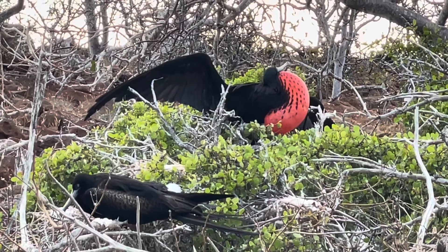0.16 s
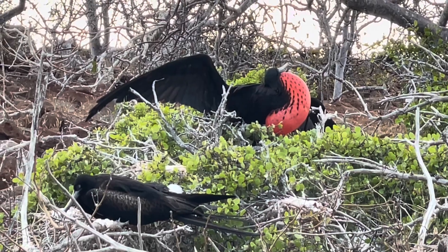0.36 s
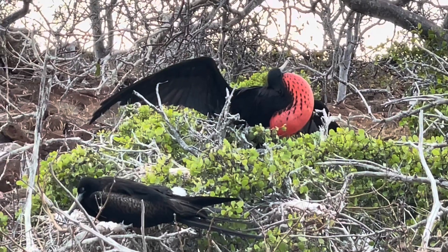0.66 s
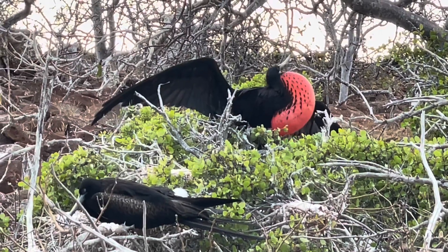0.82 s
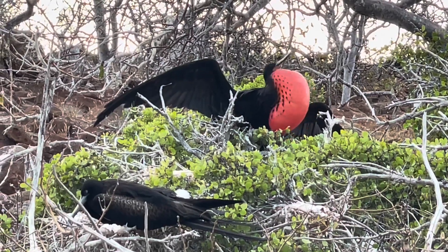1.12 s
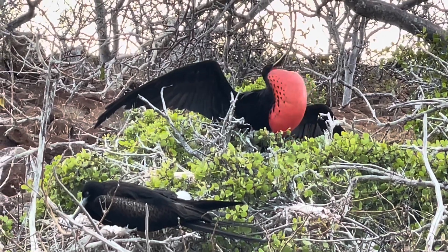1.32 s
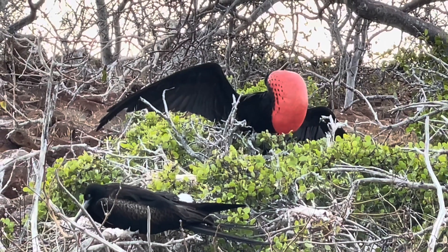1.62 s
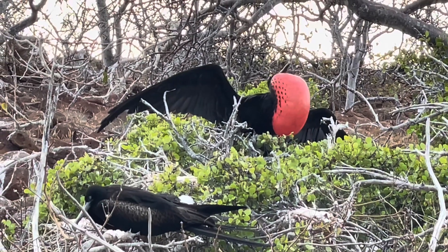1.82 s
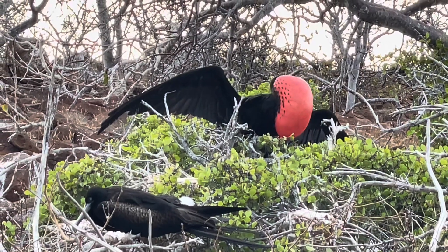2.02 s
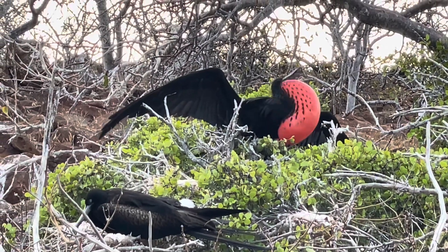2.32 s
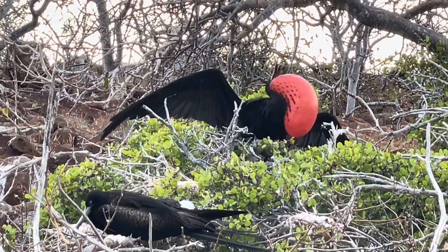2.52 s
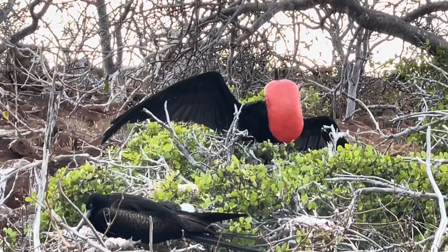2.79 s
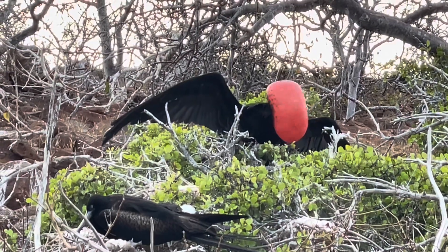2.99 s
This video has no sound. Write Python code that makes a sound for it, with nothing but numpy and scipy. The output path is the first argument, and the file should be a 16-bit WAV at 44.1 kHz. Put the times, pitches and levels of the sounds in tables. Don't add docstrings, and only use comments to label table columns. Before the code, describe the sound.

Outdoors among bushes, seabird bill rattling ticks softly under a trembling rising whistle, then bright short chips and dry ticks quicken, a second whistle wavers, and a hollow pouch knock closes, over low wind rumble.

```python
import sys
import numpy as np
from scipy import signal
from scipy.fft import rfft, irfft
from scipy.io import wavfile
from scipy.ndimage import uniform_filter1d

SR = 44100
rng = np.random.default_rng(int(sys.argv[2]) if len(sys.argv) > 2 else 0)


def gain_from_decibels(decibels):
    exponent = np.asarray(decibels, float) / 20
    return 10 ** exponent


def master_out(mix):
    frames = np.transpose(np.atleast_2d(mix))
    ceiling = np.clip(frames, -1, 1)
    pcm = np.round(ceiling * 32767).astype(np.int16)
    wavfile.write(sys.argv[1], SR, pcm)


N = 138915
OPPOSED = np.array([[1], [-1]])


def curve(table, x, col=1):
    rows = np.array(table, float)
    return np.interp(x, rows[:, 0], rows[:, col])


def unit(x):
    return x / np.sqrt(np.mean(x ** 2))


def band(x, lo_hz, hi_hz):
    edges_hz = [lo_hz, min(hi_hz, 0.45 * SR)]
    return signal.sosfilt(signal.butter(2, edges_hz, "band", fs=SR, output="sos"), x)


def walk(rate_hz):
    k = int(SR / rate_hz)
    steps = np.repeat(rng.standard_normal(N // k + 1), k)
    return unit(uniform_filter1d(uniform_filter1d(steps, k), k)[:N])


def add(out, s, sound, pan_db=0.0):
    i = int(round(s * SR))
    n = min(len(sound), N - i)
    out[:, i:i + n] += sound[:n] * gain_from_decibels(pan_db * OPPOSED / 2)


# t/s, peak level/dB, f/Hz, level of lowest partial/dB
CHIP_EVENTS = [
    (2.0213, -40.5, 4764, -8),
    (2.1441, -47, 4670, -1.5),
    (2.2548, -54.5, 4470, 2.5),
    (2.349, -46, 4680, -7.5),
    (2.4639, -39.5, 4790, -10),
    (2.571, -39.5, 4710, -11.5),
    (2.6845, -38, 4784, -8.5),
    (2.817, -34.5, 4770, -13),
    (3.0833, -41, 4620, -6),
]
# f of lowest partial/Hz, upper partials' level/dB, crack level/dB
CHIP_SPECTRA = [(2320, 9, -26), (2430, -8, -32), (2400, 3, -17), (2450, 2.5, -24), (2480, 0, -18),
                (2350, 8.5, -20), (2450, 8, -25), (2450, 4.5, -22.5), (2380, -2, -21.5)]
# ratio to the pitch, level/dB
UPPER_PARTIALS = [(1.139, -22), (1.37, -28), (1.46, -22.5), (1.62, -38), (1.98, -33.5), (2.4, -57)]


def chips():
    hold_s, rise_s, fall_s, sag = 0.00192, 0.00039, 0.0005, 0.0085
    out, t = np.zeros((2, N)), np.arange(400) / SR
    rise = 1 - np.exp(-(t / rise_s) ** 2)
    env = rise * np.exp(-np.maximum(t - hold_s, 0) / fall_s)
    turn = 2 * np.pi * (t - sag * t ** 2 / hold_s / 2)
    phases = rng.random((len(CHIP_EVENTS), 8))
    noises = rng.standard_normal((len(CHIP_EVENTS), 400))
    for event, spectrum, phase, noise in zip(CHIP_EVENTS, CHIP_SPECTRA, phases, noises):
        s, db, hz, low_db = event
        low_hz, top_db, crack_db = spectrum
        octave = env * np.sin(hz * turn)
        fundamental = np.roll(env, 20) * np.sin(low_hz * turn + 2 * np.pi * phase[0])
        tone = octave + gain_from_decibels(low_db) * fundamental
        for (ratio, partial_db), p in zip(UPPER_PARTIALS, phase[1:]):
            level = gain_from_decibels(partial_db + top_db * (ratio > 1.2))
            tone += level * env * np.sin(ratio * hz * turn - 2.5 + 2.8 * p)
        tone += gain_from_decibels(crack_db) * rise * np.exp(-t / 0.0015) * 3 * band(noise, 3000, 7700)
        add(out, s - 0.0009, gain_from_decibels(db + 2) * tone)
    return out


def clicks(table, col, lo_hz, hi_hz, decay_s, gain_db):
    out, t = np.zeros((2, N)), np.arange(600) / SR
    for row, noise in zip(table, rng.standard_normal((len(table), 600))):
        crack = band((noise + 0.89 * (t == 0)) * np.exp(-t / decay_s), lo_hz, hi_hz)
        add(out, row[0], gain_from_decibels(row[col] + gain_db) * crack / np.abs(crack).max())
    return out


# t/s, treble peak level/dB, mid peak level/dB, low peak level/dB
TICK_EVENTS = [(.4352, -55.5, -54, -52.5), (.447, -70, -68, -68), (1.599, -71, -80, -55.5),
               (1.8035, -79, -62.5, -62.5), (2.021, -59, -73, -70), (2.0485, -68, -60, -55),
               (2.185, -63, -57, -48.5), (2.211, -60, -67, -50), (2.2535, -70, -73, -61),
               (2.294, -68, -66, -58.5), (2.348, -69, -65, -59), (2.3885, -71, -73, -59.5),
               (2.463, -52, -77, -80), (2.529, -71, -64, -57), (2.5705, -60, -75, -75),
               (2.6072, -54, -54, -53), (2.635, -57, -58, -56), (2.684, -59, -75, -74),
               (2.7228, -64, -63, -58), (2.7535, -64, -58, -57), (2.877, -91, -64, -53.5),
               (3.1197, -52, -36, -38)]


def ticks():
    out = clicks(TICK_EVENTS, col=1, lo_hz=8200, hi_hz=14800, decay_s=0.00027, gain_db=2.5)
    out += clicks(TICK_EVENTS, col=2, lo_hz=3240, hi_hz=8300, decay_s=0.00094, gain_db=-6.0)
    return out + clicks(TICK_EVENTS, col=3, lo_hz=1760, hi_hz=3900, decay_s=0.0026, gain_db=-1.0)


def whistle(crest, dips, dip_s):
    t = np.arange(N) / SR
    s, drop_hz, swell_db = np.array(dips, float).T
    dip = np.exp(-np.abs((t[:, None] - s) / dip_s) ** 2.5)
    hz = curve(crest, t) - dip @ drop_hz
    sweep = np.abs(np.gradient(hz)) * SR
    db = curve(crest, t, col=2) + dip @ swell_db - 6.5 * sweep / 124000.0
    on = uniform_filter1d(1.0 * (t > crest[0][0]) * (t < crest[-1][0]), size=400)
    waver_db, waver_hz = 1.3 * walk(130), 15 * walk(200)
    return on * gain_from_decibels(db + 3 + waver_db) * np.sin(2 * np.pi * np.cumsum(hz + waver_hz) / SR)


# t/s, f/Hz, level/dB
FIRST_CREST = [
    (.555, 2000, -78.5),
    (.62, 2204, -69.5),
    (.70, 2232, -66),
    (.787, 3050, -67),
    (.87, 2880, -63.5),
    (.99, 3402, -67.5),
    (1.09, 3964, -82),
    (1.20, 3518, -75),
    (1.39, 3646, -81),
]
SECOND_CREST = [
    (2.612, 2050, -67),
    (2.64, 2583, -72.5),
    (2.685, 2850, -68.5),
    (2.775, 3003, -102),
    (2.79, 3084, -76),
    (2.83, 3250, -76),
    (2.92, 3286, -66),
    (3.02, 3290, -71.5),
    (3.15, 3500, -76.5),
]
# t/s, drop in f/Hz, change in level/dB
FIRST_DIPS = [(0.767, 298, 5), (.802, 559, 6), (.84, 400, 4.5), (0.874, 251.4, 3), (.912, 401.6, 2.5),
              (.946, 618.4, 7.5), (.982, 784, 6.5), (1.022, 947, 11), (1.053, 1164, 18.5),
              (1.088, 1327, 23.5), (1.124, 1209, 22.5), (1.157, 478, 9), (1.187, 299, 11.5),
              (1.229, 420, 13), (1.263, 884, 10.5), (1.303, 1104, 18), (1.342, 1180, 16), (1.361, 828, 9.5),
              (1.376, 1158, 9.5)]
SECOND_DIPS = [(2.65, 149, 0), (2.79, 78.5, 9), (2.834, 398, 1), (2.874, 562, 7.5), (2.905, 202, -2),
               (2.937, 117, -1), (2.968, 600, 1), (3.031, 706, 7), (3.066, 869, 10.5), (3.10, 920, 17),
               (3.133, 980, 19)]
# t/s, f/Hz, level/dB
OTHER_PIPE = [
    (.84, 2750, -91),
    (.9, 2775, -83),
    (1.23, 2763, -75.5),
    (1.29, 2730, -96),
]


def second_bird():
    first = whistle(FIRST_CREST, FIRST_DIPS, dip_s=0.011)
    second = whistle(SECOND_CREST, SECOND_DIPS, dip_s=0.009)
    late_rises = [(d[0] + 0.016, -60, -4) for d in FIRST_DIPS]
    return first + second + whistle(OTHER_PIPE, late_rises, dip_s=0.009)


# t/s, peak level/dB
KNOCK_EVENTS = [
    (1.599, -49),
    (3.1189, -29.5),
]
# f/Hz, level/dB, T60/s
POUCH_MODES = [(374, -5, 0.12), (753, 4, 0.057), (1184, 3, 0.075), (1536, -16.5, 0.32), (3280, -4, 0.012),
               (600, 11.5, 0.011), (980, 8.5, 0.013)]


def knocks():
    out, t = np.zeros((2, N)), np.arange(6000) / SR
    for (s, db), noise in zip(KNOCK_EVENTS, rng.standard_normal((len(KNOCK_EVENTS), 6000))):
        ring = np.zeros(len(t))
        for hz, mode_db, t60 in POUCH_MODES:
            swell = 1 - np.exp(-t * hz / 0.33)
            decay = np.exp(-np.log(1000) * t / t60)
            ring -= gain_from_decibels(mode_db) * np.sin(2 * np.pi * hz * t - 450 / hz) * swell * decay
        add(out, s + 0.001117, gain_from_decibels(db) * ring / 4, pan_db=-1.5)
        crack = unit(band(noise, 520, 2030)) * np.exp(-t / 0.0052)
        add(out, s, gain_from_decibels(db - 20.5) * crack, pan_db=-1.5)
    return out


# t/s, length/s, level/dB, top f/Hz
RUSTLE_EVENTS = [(0.432, 0.043, -86, 15000), (1.42, 0.033, -96.5, 14500), (2.06, 0.018, -92, 14000),
                 (2.148, .012, -88, 13500), (2.215, 0.028, -91, 15500), (2.28, 0.033, -86, 14700),
                 (2.364, .008, -87, 13500), (2.396, .022, -89, 16000), (2.5, .035, -91, 14300),
                 (2.573, 0.01, -87, 13800), (2.63, 0.022, -87, 14800), (2.747, .04, -89, 15000),
                 (2.84, .02, -106, 14300), (3.13, 0.011, -71.5, 15500)]


def rustles():
    t, out = np.arange(N) / SR, np.zeros((2, N))
    crackle_db = 1.7 * uniform_filter1d(rng.exponential(size=N), size=3)
    grains = rng.standard_normal((2, N)) * gain_from_decibels(crackle_db)
    grains = grains[0] + 0.45 * OPPOSED * grains[1]
    low = gain_from_decibels(5.5) * unit(band(grains, 3600, 6300))
    for s, length, db, top_hz in RUSTLE_EVENTS:
        near = slice(int((s - 2 * length) * SR), int((s + 2 * length) * SR))
        high = unit(band(band(grains[:, near], 10300, top_hz), 10300, top_hz))
        puff = np.exp(-((t[near] - s) / length) ** 4)
        out[:, near] += gain_from_decibels(db) * puff * (high + low[:, near])
    return out * gain_from_decibels(2.0 * walk(39.8))


# t/s, peak level/dB, centre f/Hz
RATTLE_BEATS = [(0.0102, -68, 4730), (0.0424, -73, 3700), (0.0762, -76, 4800), (0.109, -66.5, 4060),
                (0.1411, -77, 3870), (0.1714, -63, 3890), (0.184, -70, 5280), (0.1954, -68, 3800),
                (0.2069, -69, 3840), (0.2405, -63.5, 3820), (0.2743, -74, 3700), (0.3093, -70.5, 4150),
                (0.3415, -67, 4000), (0.3754, -70, 4000), (0.398, -73, 4440), (0.4086, -66, 4300),
                (0.4753, -69, 5210), (0.5116, -68, 4140), (0.5437, -73, 5420), (0.5795, -69.5, 5220),
                (0.6139, -77, 3900), (0.648, -78, 4350), (0.6799, -71.5, 5180), (0.7155, -71, 4800),
                (0.7493, -69, 3820), (0.784, -70, 4610), (0.8153, -68, 4400), (0.8494, -75, 4930),
                (0.887, -68.5, 3860), (0.9817, -72, 3800), (1.0174, -79, 3700), (1.0489, -69, 3810),
                (1.7289, -78, 3730), (1.8628, -73, 4100), (1.93, -66, 5000), (2.9478, -61.5, 3880)]


def rattle():
    out, t = np.zeros((2, N)), np.arange(400) / SR
    for (s, db, hz), noise in zip(RATTLE_BEATS, rng.standard_normal((len(RATTLE_BEATS), 2, 400))):
        crack = band(noise[0], hz / 1.4, hz * 1.12) + gain_from_decibels(-15) * band(noise[1], 2900, 8200)
        crack = crack * np.exp(-t / 0.0017)
        add(out, s, gain_from_decibels(db + 0.5) * crack / np.abs(crack).max())
    return out


# start t/s, end t/s, first
# f/Hz, last f/Hz, level/dB
FAR_WHISTLES = [
    (1.407, 1.543, 2400, 2494, -86),
    (1.548, 1.615, 2880, 3000, -86),
    (1.606, 1.673, 2320, 2255, -80.5),
    (1.709, 1.87, 2500, 2545, -86),
    (1.841, 2.002, 2890, 3150, -84.5),
    (1.902, 1.95, 5320, 5150, -89),
    (1.025, 1.255, 3900, 3930, -94),
]


def far_calls():
    total = 0
    for s0, s1, hz0, hz1, db in FAR_WHISTLES:
        total = total + whistle([(s0, hz0, db), (s1, hz1, db)], [(s0, 0, 0)], dip_s=0.009)
    return total * gain_from_decibels(4 * walk(40) - 3)


def shrubs(x):
    t = np.arange(int(0.4 * SR)) / SR
    fade = np.exp(-np.log(1000) * t / 0.24) + gain_from_decibels(6) * np.exp(-t / 0.0045)
    patchy = gain_from_decibels(1.5 * walk(300)[:len(t)] + 5 * rng.standard_normal(len(t)))
    after_gap = t > 0.0012
    tails = band(rng.standard_normal((2, len(t))) * patchy * fade * after_gap, 240, 12000)
    tails[1] = 0.85 * tails[0] + 0.5 * tails[1]
    tails /= np.sqrt(np.sum(tails[0] ** 2))
    return gain_from_decibels(-13) * np.array([signal.fftconvolve(x, tail)[:N] for tail in tails])


# f/Hz, lead of the left port/rad
PORT_PHASE = [(1400, 0), (5000, 0.9), (5900, -1), (7700, -1.2), (9500, -4.2), (12000, -6)]


def ports(x):
    turn = curve(PORT_PHASE, np.arange(N // 2 + 1) * SR / N) / 2
    return irfft(rfft(x) * np.exp(1j * turn * OPPOSED), N)


# t/s, level/dB
DRONE_LEVEL = [(0, -55.5), (.15, -51), (.42, -51.5), (.62, -46.5), (.7, -61.5), (.8, -50), (1.03, -59.5),
               (1.13, -43), (1.21, -57), (1.32, -53), (1.68, -45.5), (1.78, -65), (2.26, -49), (2.35, -54),
               (2.43, -50), (2.76, -50), (2.86, -70), (3.15, -54.5)]
# f/Hz, width/Hz, level/dB
RUMBLE_BANDS = [(58.4, 17.9, -57), (90.6, 5.2, -60.5), (128.56, 13.8, -59), (160.4, 34, -66)]


def drone():
    t = np.arange(N) / SR
    hz = 66.3 + 2.544 * walk(10)
    low = gain_from_decibels(curve(DRONE_LEVEL, t) + 1.5) * np.sin(2 * np.pi * np.cumsum(hz) / SR)
    for hz, width, db in RUMBLE_BANDS:
        low += gain_from_decibels(db) * unit(band(rng.standard_normal(N), hz - width / 2, hz + width / 2))
    return low * gain_from_decibels(1.6 * OPPOSED / 2)


def shaped_noise(table):
    rows, hz = np.array(table, float), np.arange(N // 2 + 1) * SR / N + 0.0012
    outside = (hz < rows[0, 0]) | (hz > rows[-1, 0])
    db = np.interp(np.log(hz), np.log(rows[:, 0]), rows[:, 1]) - 60 * outside
    return rfft(rng.standard_normal(N)) * gain_from_decibels(db), hz


# f/Hz, level/dB
SIDE_LEVEL = [(60, -7), (380, -6.5), (700, 4.5), (1290, -4.5), (2380, -20.5), (4400, -17), (8100, 11),
              (15000, -11.5)]


def air(table, db, flicker_db):
    mid, hz = shaped_noise(table)
    side = shaped_noise(table)[0] * gain_from_decibels(curve(SIDE_LEVEL, hz))
    mid, side = irfft(mid, N), irfft(side, N)
    level = gain_from_decibels(db + flicker_db * walk(12.0)) / np.sqrt(np.mean(mid ** 2))
    return level * (mid + side * OPPOSED)


# f/Hz, level per Hz/dB
WIND_SPECTRUM = [(28, -13), (100, 2.5), (300, -11.5), (800, -20), (1400, -21.5), (1800, -29), (2600, -28.5),
                 (4000, -42.5)]
HISS_SPECTRUM = [(4000, 0), (7400, -8), (8300, -22), (9800, -16.5), (10800, -9.5), (13200, -12.5),
                 (14200, -15), (15800, -34)]


def wind():
    return air(WIND_SPECTRUM, -59.5, flicker_db=1.15) + air(HISS_SPECTRUM, -91, flicker_db=1.0)


def scene():
    bill = chips() + ticks()
    far = rattle()
    calls = second_bird() + far_calls()
    echo = shrubs(bill[0] + far[0] + gain_from_decibels(6.0) * calls)
    low = drone()
    flow = wind()
    return ports(bill + far + calls + echo + rustles()) + knocks() + low + flow


def top_cut(x):
    return signal.sosfilt(signal.butter(12, 16500, fs=SR, output="sos"), x)


def record(dry):
    low_pass = signal.ellip(8, 0.2, 50, 15800, fs=SR, output="sos")
    mix = signal.sosfilt(low_pass, dry)
    return top_cut(mix)


dry = scene()
out = record(dry)
master_out(out)
```